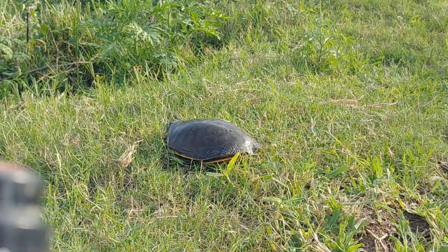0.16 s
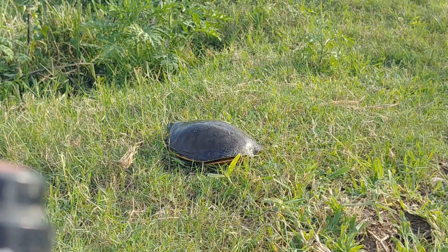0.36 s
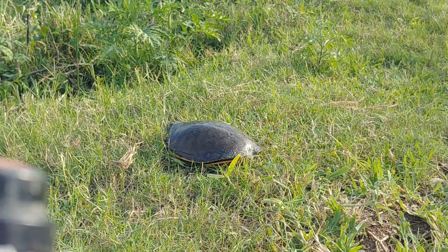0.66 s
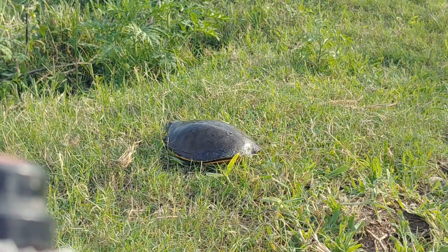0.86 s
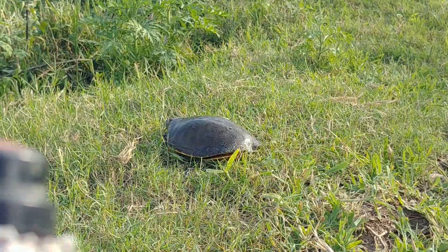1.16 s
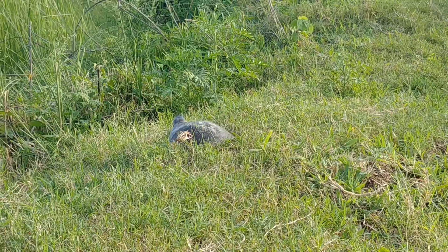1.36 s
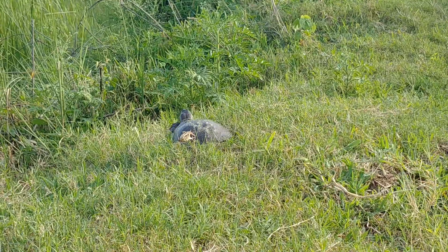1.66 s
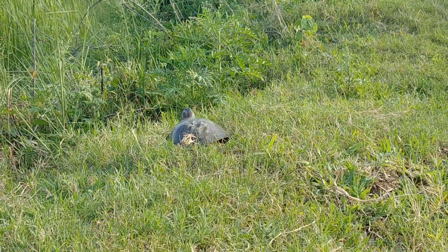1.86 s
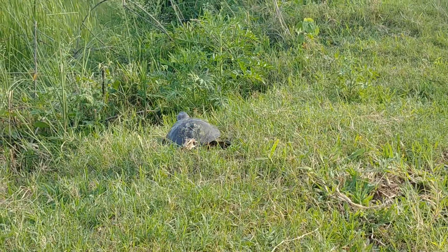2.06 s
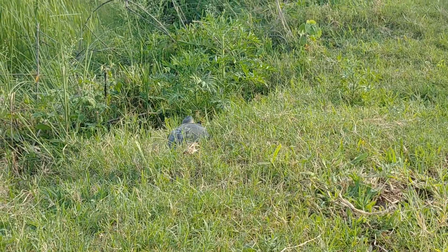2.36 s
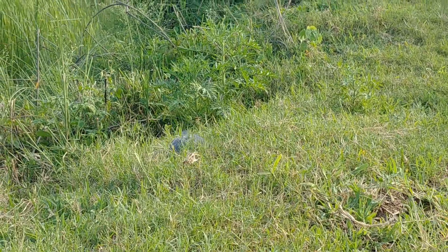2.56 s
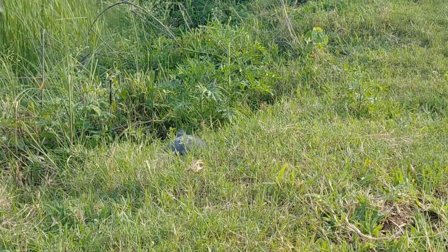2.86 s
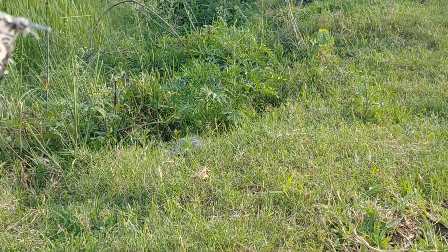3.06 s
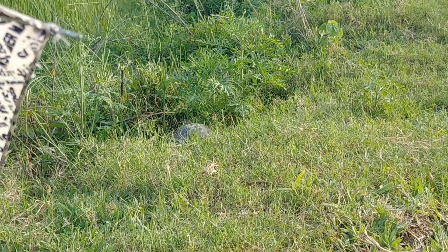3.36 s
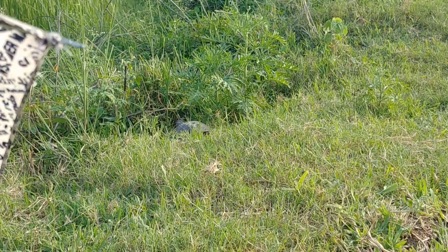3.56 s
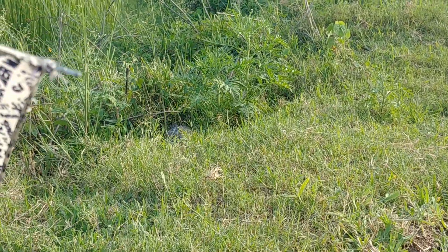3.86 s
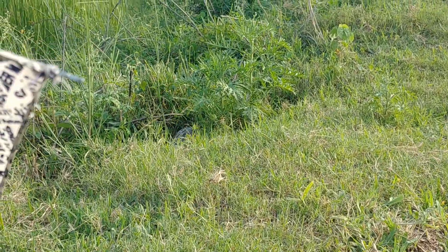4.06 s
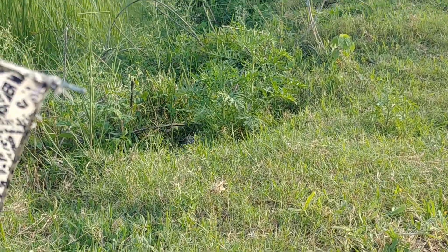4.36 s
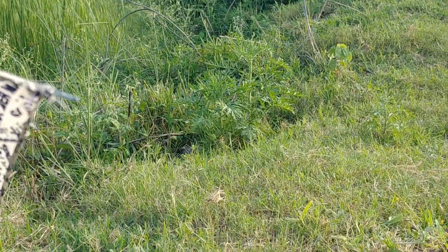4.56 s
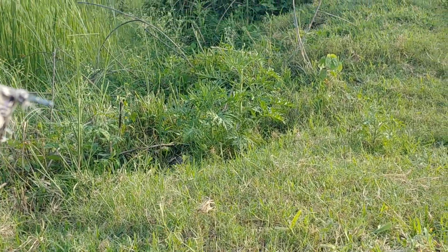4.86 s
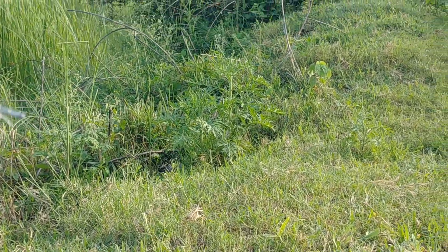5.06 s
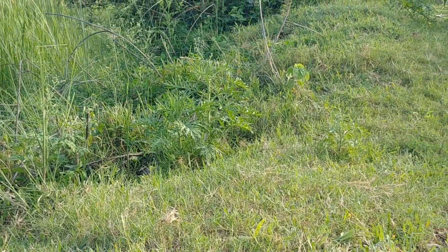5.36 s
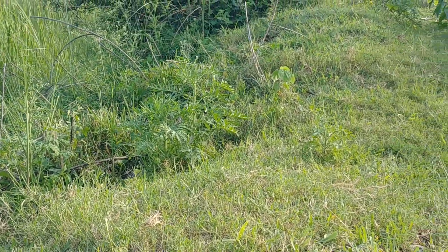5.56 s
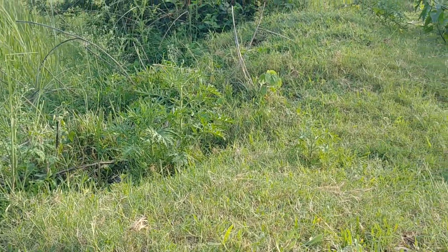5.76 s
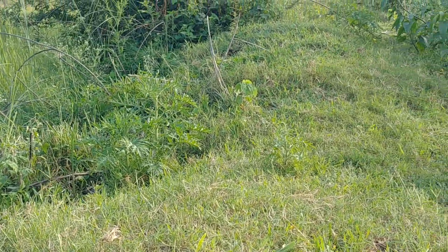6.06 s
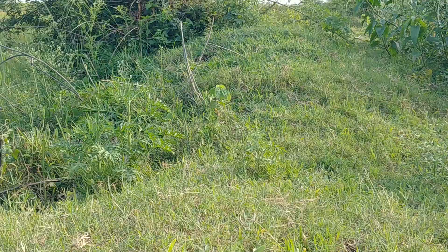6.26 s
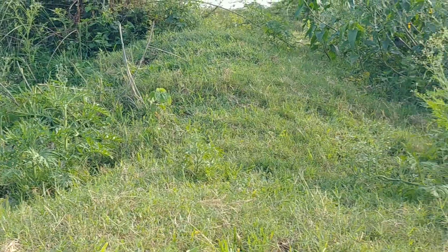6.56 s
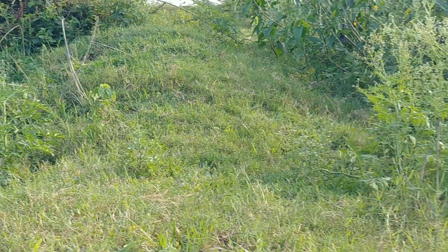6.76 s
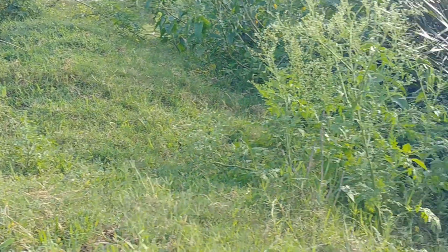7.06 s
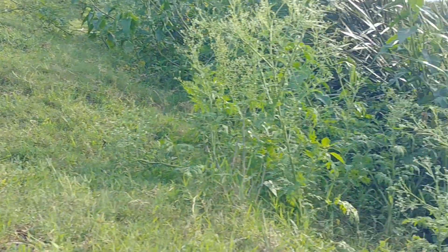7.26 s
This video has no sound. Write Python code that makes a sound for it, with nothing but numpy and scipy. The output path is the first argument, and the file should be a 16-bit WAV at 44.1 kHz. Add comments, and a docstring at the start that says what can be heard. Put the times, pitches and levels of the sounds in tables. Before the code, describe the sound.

Small birds chip, warble and give buzzy falling calls from bushes over a steady high cricket shrill, with soft wind puffs and dry ticks.

```python
"""Grassy canal bank

Small birds trade short chips, buzzy falling answers, low warbles and slurred whistles in the bushes, each call
a gliding near-pure tone followed by scattered echoes. Crickets shrill high and steadily: raspy carriers that throb.
Light puffs of wind, mostly on the left, are bursts of low noise; dry grass rustles and ticks as shaped noise.
Something drones far away: a low rumble with a wavering hum, under an open-air hush."""
import sys
import numpy as np
from scipy import signal
from scipy.fft import rfft, irfft
from scipy.io import wavfile
from scipy.ndimage import uniform_filter1d, map_coordinates

SR = 44100
rng = np.random.default_rng(int(sys.argv[2]) if len(sys.argv) > 2 else 0)


def int16_out(signal):
    """Quantize to a 16-bit WAV file."""
    q = np.round(np.clip(np.atleast_2d(signal).T, -1, 1) * 32767)
    wavfile.write(sys.argv[1], SR, q.astype(np.int16))


N = 326340
TIME = np.arange(N) / SR


def from_db(db):
    """Amplitude of a level in dB."""
    return 10 ** (np.asarray(db) / 20)


def rms_one(x):
    """Scale a sound to an rms of 1."""
    return x / np.sqrt(np.mean(x ** 2) + 1e-20)


def in_time(rows):
    """Draw straight lines through (seconds, value) points over the whole scene."""
    return np.interp(TIME, *np.transpose(rows))


def pan(db):
    """Left and right gains of constant power; positive leans left."""
    gains = from_db([[db / 2], [-db / 2]])
    return rms_one(gains)


def add(out, s, sound):
    """Mix a stereo sound in at time s."""
    at = max(0, int(s * SR))
    out[:, at:at + sound.shape[1]] += sound[:, :max(0, N - at)]


def drift(rate, size):
    """A smooth random wander of spread about 1, with `rate` random knots per second."""
    knots = rng.standard_normal(int(size / SR * rate) + 4)
    return map_coordinates(knots, [np.arange(size) / SR * rate], order=3, mode="nearest")


def noise(spectrum):
    """Coloured noise, unrelated in the two channels; rms 1."""
    hz, db = np.transpose(spectrum)
    bins_hz = np.fft.rfftfreq(N, 1 / SR)
    gain = from_db(np.interp(np.log(bins_hz + 1), np.log(hz), db))
    white = rng.standard_normal((2, N))
    return rms_one(irfft(rfft(white) * gain, N))


# Colour of the open-air hush. Each row: frequency in Hz, relative density in dB per Hz.
AIR_COLOUR = [(30, 10.5), (200, 8.5), (400, 1), (700, 3), (1200, -1.5), (1800, -5), (2600, -0.5),
              (4500, -8.5), (7000, -10.5), (10000, -42), (13000, -13.5), (16000, -13)]


def hush(level_db=-65):
    """Open air: steady broadband noise."""
    return from_db(level_db) * noise(AIR_COLOUR)


# Strength of the distant drone's rumble. Each row: time in seconds, level in dB.
DRONE_LEVEL = [(0, -60), (.5, -71), (1.4, -56), (7.4, -56)]
# Colour of the rumble. Each row: frequency in Hz, relative density in dB per Hz.
DRONE_COLOUR = [(30, -12), (80, -1.5), (140, -8), (200, -8.5), (300, -25), (600, -29), (2000, -75.5)]
# Harmonics of the hum. Each row: multiple of the turning rate, level in dB relative to the rumble.
HUM_HARMONICS = [(2, -2.5), (3, -2), (4, -9.5)]
HUM_HZ = 45.62


def distant_drone(side_db=5, unsteadiness=0.0164):
    """A low rumble with the wavering harmonic hum of a distant motor."""
    turns = 2 * np.pi * np.cumsum(HUM_HZ * (1 + unsteadiness * drift(5, N))) / SR
    hum = sum(from_db(db) * np.sin(multiple * turns) for multiple, db in HUM_HARMONICS)
    return pan(side_db) * from_db(in_time(DRONE_LEVEL)) * (noise(DRONE_COLOUR) + hum)


# Swishes of grass. Each row: middle in seconds, width in seconds, peak level in dB.
GRASS_SWISHES = [(1.109, 0.026, -58.5), (1.26, .12, -58.5), (1.421, 0.049, -53), (4.38, 0.051, -56.5),
                 (6.9, 1.2, -64.5)]
# Colour of grass on grass. Each row: frequency in Hz, relative density in dB per Hz.
GRASS_COLOUR = [(60, -20.5), (300, 8.5), (1300, 3), (2000, -1), (4500, -1), (7000, -9), (10000, -49.5)]


def grass(crinkle_db=3.0, stirring_db=-71):
    """Blades slip in small uneven bursts: a faint stirring that builds up, and swishes that swell over it."""
    blades = rms_one(noise(GRASS_COLOUR) * from_db(crinkle_db * drift(70, N)))
    first_swish_s = GRASS_SWISHES[0][0]
    stirring = from_db(stirring_db) * np.clip(TIME / first_swish_s, 0, 1) ** 2
    swish_power = sum(from_db(2 * db) * np.exp(-2 * ((TIME - s) / width) ** 2)
                      for s, width, db in GRASS_SWISHES)
    return np.sqrt(stirring ** 2 + swish_power) * blades


# Single crickets. Each row: carrier in Hz, early level in dB, later level in dB, throbs per second,
# time of one throb in seconds.
CRICKET_VOICES = [(7704, -59.5, -56.5, 2.7, 2.7), (7780, -59, -55.5, 9.1, 1.8), (7982, -54.5, -53, 5, 1.8),
                  (8035, -55, -59.5, 8, 0.89), (8100, -53.5, -51.5, 6.35, 1.88),
                  (8270, -53.5, -67, 7.5, 0.57)]
# Colour of the far chorus. Each row: frequency in Hz, relative density in dB per Hz.
CHORUS_COLOUR = [(6400, -51), (7200, -23.5), (7600, -3.5), (8000, 4), (8400, -6.5), (8850, -18.5),
                 (9200, -77.5)]
BALANCE_SHIFT_S = 1.45   # the balance between the cricket tones shifts abruptly


def crickets(throb_db=4, pulse_db=2, quick_db=3.5, wander_hz=14, rasp=0.67, rasp_hz=70,
             chorus_db=-52, side_db=16.0):
    """Each wing rings on a raspy tone and throbs about 3 to 9 times a second in several strokes, over a chorus."""
    out = from_db(chorus_db) * noise(CHORUS_COLOUR)
    later = np.clip((TIME - BALANCE_SHIFT_S) * 20, 0, 1)   # levels glide from early to later in 50 ms
    for hz, early_db, later_db, rate, throb_s in CRICKET_VOICES:
        phase = 2 * np.pi * np.cumsum(hz + wander_hz * drift(20, N)) / SR
        # The way through swaying grass shifts the phase at each side.
        paths = np.array([drift(4, N), drift(6.1, N)])
        tone = rms_one(np.sin(phase + paths))
        band = signal.butter(2, [hz - rasp_hz, hz + rasp_hz], "band", fs=SR, output="sos")
        scrape = rms_one(signal.sosfilt(band, rng.standard_normal((2, N))))
        wing = tone + rasp * scrape
        turn = 2 * np.pi * rate * (TIME - throb_s) + 0.57 * drift(2.1, N)
        strokes = from_db(throb_db * np.cos(turn) + pulse_db * np.cos(3 * turn) + quick_db * np.cos(4 * turn))
        level = from_db(early_db + later * (later_db - early_db))
        out = out + level * rms_one(wing * strokes)
    return pan(side_db) * out


def syrinx(hz, rise, fall):
    """A bird's voice: a pure tone on a pitch path that swells and fades over given shares of its length."""
    u = np.linspace(0, 1, len(hz))
    swell = np.sin(np.pi / 2 * np.clip(np.minimum(u / rise, (1 - u) / fall), 0, 1))
    return swell * np.sin(2 * np.pi * np.cumsum(hz) / SR)


FLICKS_PER_S, FIRST_FLICK_S = 50, .009   # the rate is varied slightly from call to call
FLICK_LAG, FLICK_SETTLE_S = .4, .025   # lag in flicks, and the time constant with which it builds


def chirp(length, first_hz, rest_hz, sink_s, swing, droop, droop_s, jitter, jitter_rate, flutter_db, crest_db,
          scoop, sharpness, rise, fall, ceiling_hz,
          widening=0.4, second_db=-20, second_ratio=.72, scoop_s=0.00405):
    """Pitch scoops up, sinks to rest with hoarse upward crests, then droops; the syrinx's other side is lower."""
    t = np.arange(int(length * SR)) / SR
    since = t - FIRST_FLICK_S
    lag = FLICK_LAG * (1 - np.exp(-since / FLICK_SETTLE_S))
    flicks = FLICKS_PER_S * since * rng.normal(1, .02) - lag
    crest = uniform_filter1d((1 - abs(np.sin(np.pi * flicks))) ** sharpness, size=130)
    scooping = 1 - scoop * np.exp(-t / scoop_s)
    drooping = 1 - droop * np.exp((t - length) / droop_s)
    glide = (rest_hz + (first_hz - rest_hz) * np.exp(-t / sink_s)) * scooping * drooping
    reach = swing * (1 + widening * t / length)   # the crests stay high while the troughs sink
    hoarseness = jitter * (.5 + 2 * crest) * drift(jitter_rate, len(t))
    hz = glide * (1 + reach * (crest - crest.mean()) + hoarseness)
    hz = hz / (1 + (hz / ceiling_hz) ** 20) ** (1 / 20)   # the voice cannot go higher than its ceiling
    strength = from_db(crest_db * crest + flutter_db * drift(144.3, len(t)))
    voice = syrinx(hz, rise, fall) * strength
    return rms_one(voice + from_db(second_db) * syrinx(hz * second_ratio, rise, fall))


# One bird's short chips. Each row: start in seconds, length in seconds, level in dB before the bushes.
CHIP_CALLS = [(0, 0.043, -60.5), (.775, 0.052, -60), (2.035, 0.048, -64.5), (2.157, .066, -56.5),
              (2.714, 0.057, -50), (2.867, 0.022, -57.5), (3.009, 0.077, -48.5), (3.506, 0.064, -50.5),
              (3.622, 0.022, -59.5), (3.833, .062, -48.5), (4.166, 0.053, -41), (5.047, 0.055, -49),
              (5.707, 0.049, -45.5), (6.378, 0.056, -46.5)]


def chips(first_hz=4850, side_db=4.5):
    """Short hoarse calls of a few quick pitch flicks."""
    out = np.zeros((2, N))
    for s, length, db in CHIP_CALLS:
        call = chirp(length, first_hz, rest_hz=4230, sink_s=0.0513, swing=0.338, droop=.31, droop_s=.01,
                     jitter=.052, jitter_rate=800, flutter_db=2.5, crest_db=-2, scoop=.17, sharpness=1.2,
                     rise=.24, fall=.33, ceiling_hz=5900)
        add(out, s, pan(side_db) * from_db(db) * call)
    return out


# A lower bird's warbles. Each row: start in seconds, length in seconds, central pitch in Hz,
# level in dB before the bushes.
WARBLE_CALLS = [(0.057, 0.13, 2930, -68.5), (0.386, 0.15, 2920, -72), (1.744, .12, 2943, -53.5),
                (3.053, .12, 2760, -58.5), (3.398, 0.13, 2723, -56.5), (3.81, 0.12, 2767, -52.5),
                (4.132, .125, 2750, -53), (6.134, 0.14, 3010, -48.5), (6.448, 0.16, 2980, -52.5),
                (7.146, 0.064, 3050, -51)]


def warbles(count=3, lead=.25, lead_from=.84, top=1.18, bottom=0.72, loudest=.35, gap_db=20, lead_db=-9,
            jitter=.024, edge=0.22, side_db=-4.5):
    """A soft rising lead-in, then three notes that each slide down and are loudest on the way."""
    out = np.zeros((2, N))
    for s, length, pitch, db in WARBLE_CALLS:
        u = np.linspace(0, 1, int(length * SR))
        leading = u < lead
        note = (count * (u - lead) / (1 - lead)) % 1   # progress through each note
        rising = lead_from + (1 - lead_from) * (u / lead) ** 2
        sliding = top * (bottom / top) ** note
        ratio = np.where(leading, rising, sliding)
        level = np.where(leading, lead_db, -gap_db * np.sin(np.pi * (note - loudest)) ** 2)
        hz = pitch * uniform_filter1d(ratio, size=200) * (1 + jitter * drift(160, len(u)))
        voice = syrinx(hz, edge, edge) * from_db(uniform_filter1d(level, size=200))
        add(out, s, pan(side_db) * from_db(db) * rms_one(voice))
    return out


def whistle(hz, waver, flutter_db, rise=0.13, fall=0.4):
    """A pure tone that wavers a little in pitch and strength; rms 1."""
    wavering_hz = hz * (1 + waver * drift(130, len(hz)))
    flutter = from_db(flutter_db * drift(71, len(hz)))
    return rms_one(syrinx(wavering_hz, rise, fall) * flutter)


def far_chirps(calls_per_s=2.5, middle_db=-73.5, pitch_hz=4500, length_s=0.065, spread=0.081, swing=.09,
               side_db=3, uneven_db=3):
    """Faint wavering calls from further along the bank, each at a random moment of its own time slot."""
    out = np.zeros((2, N))
    slots = np.arange(0, N / SR - 1 / calls_per_s, 1 / calls_per_s)
    chances = rng.uniform(-1, 1, (len(slots), 4))
    for s, (late, long, high, loud) in zip(slots, chances):
        size = int(length_s * 2 ** (long / 2) * SR)
        hz = np.full(size, pitch_hz * (1 + spread * high))
        gain = pan(side_db) * from_db(middle_db + uneven_db * loud)
        add(out, s + abs(late) / calls_per_s, gain * whistle(hz, swing, flutter_db=1))
    return out


# Dry stems ticking. Each row: start in seconds, level in dB, centre in Hz.
STEM_TICKS = [(0.503, -52.5, 5650), (.695, -54, 6150), (0.761, -49, 5160), (1.089, -48.5, 2850),
              (1.24, -49, 9400), (2.49, -55, 2250), (2.845, -48, 5630), (4.36, -43, 5200),
              (5.402, -59, 10050), (5.99, -46.5, 1110)]
TICK_CYCLES = 23.6   # time constant of a stem's ring, in cycles of its centre frequency


def ticks(side_db=2, attack_s=0.00069):
    """A stem snaps: a noise burst that dies fast, faster for brighter stems, in a band set by the stem."""
    out, t = np.zeros((2, N)), np.arange(SR // 10) / SR
    for s, db, hz in STEM_TICKS:
        decay = TICK_CYCLES / hz
        spread = 1 + 1500 / hz   # dull crunches span more octaves than bright snaps
        low, high = hz / spread, min(hz * spread, SR / 2.2)
        burst = rng.standard_normal((2, len(t))) * np.exp(-t / decay) * (1 - np.exp(-t / attack_s))
        band = signal.butter(3, [low, high], "band", fs=SR, output="sos")
        snap = signal.sosfilt(band, burst) * np.sqrt(SR / 2 / (high - low))   # make up for the narrow band
        add(out, s, pan(side_db) * from_db(db) * snap)
    return out


# Wind puffs on the microphone port. Each row: middle in seconds, strength in dB before the overall wind level.
WIND_PUFFS = [(1.558, -40.5), (1.678, -31.5), (1.824, -33), (1.914, -37), (2.345, -36), (2.424, -31),
              (2.637, -32), (3.518, -43.5), (4.118, -36), (4.202, -36.5), (4.281, -33.5), (4.392, -32),
              (4.576, -29.5), (4.664, -36.5), (4.735, -32), (5.068, -32.5), (5.27, -28.5), (5.854, -28.5),
              (6.345, -42), (6.654, -24.5), (7.292, -24.5)]
# Colour of the main turbulence. Each row: frequency in Hz, relative density in dB per Hz.
WIND_COLOUR = [(30, -12), (80, 3.5), (170, -1), (300, -17), (450, -39), (2000, -110)]
# Colour of the small eddies. Each row: frequency in Hz, relative density in dB per Hz.
EDDY_COLOUR = [(100, -12), (220, 1.5), (370, -10), (520, -20), (2000, -100)]
PUFF_WIDTH_S, PUFF_HALVING_DB = 0.016, 7.5   # width of a -30 dB puff; a puff this much stronger is half as long


def wind(side_db=20, level_db=-3, wake_db=-13, wake_width=2.97, strong_db=-25, eddy_growth=2.33):
    """Each puff is a knot of turbulence inside a longer, weaker wake; stronger ones shed more small, higher eddies."""
    power = np.zeros(N)
    for s, db in WIND_PUFFS:
        width = PUFF_WIDTH_S * 2 ** (-(db + 30) / PUFF_HALVING_DB)
        x = (TIME - s) / width
        knot = np.exp(-2 * x ** 2)
        wake = from_db(2 * wake_db) * np.exp(-(x / wake_width) ** 2)
        power += from_db(2 * db) * (knot + wake)
    strength = np.sqrt(power)
    eddies = (strength / from_db(strong_db)) ** eddy_growth * noise(EDDY_COLOUR)
    flow = noise(WIND_COLOUR) + eddies
    flow = flow / np.sqrt(uniform_filter1d(flow ** 2, size=900) + 0.0033)   # even strength within a puff
    return pan(side_db) * from_db(level_db) * strength * flow


# Level whistled notes. Each row: start in seconds, length in seconds, pitch in Hz, level in dB before the bushes,
# waver as a share of the pitch.
LEVEL_NOTES = [(1.639, 0.015, 2670, -60, 0.049), (4.325, 0.046, 2870, -58.5, 0.022),
               (4.836, 0.13, 2970, -68, .025), (7.25, 0.172, 3383, -51, 0.0048)]


def level_notes(side_db=-2, arch=0.01):
    """Whistled notes whose pitch arches slightly."""
    out = np.zeros((2, N))
    for s, length, pitch, db, waver in LEVEL_NOTES:
        hz = pitch * (1 - arch * np.linspace(-1, 1, int(length * SR)) ** 2)
        add(out, s, pan(side_db) * from_db(db) * whistle(hz, waver, flutter_db=5.3, rise=.2, fall=.25))
    return out


# Thin upward flicks. Each row: start in seconds, level in dB before the bushes.
UPWARD_FLICKS = [(3.328, -64), (3.635, -62), (5.931, -66), (6.688, -56.5), (7.208, -61.5)]


def upslurs(length_s=.045, from_hz=4050, to_hz=7350, side_db=9):
    """Quick whistles that sweep steadily upward in octaves."""
    out = np.zeros((2, N))
    for s, db in UPWARD_FLICKS:
        hz = np.geomspace(from_hz, to_hz, int(length_s * SR))
        add(out, s, pan(side_db) * from_db(db) * whistle(hz, waver=.012, flutter_db=2.5))
    return out


# A second bird's long buzzy answers. Each row: start in seconds, length in seconds, first pitch of the glide in Hz,
# level in dB before the bushes.
BUZZ_CALLS = [(3.922, 0.13, 5430, -51), (4.349, .12, 5010, -43.5), (5.137, 0.13, 5330, -44),
              (5.509, .12, 5190, -38.5), (5.844, 0.12, 5060, -41.5), (6.163, 0.13, 5120, -42.5),
              (6.429, .12, 5055, -38.5), (6.723, 0.16, 5000, -43), (6.882, 0.14, 5054, -39),
              (7.004, 0.13, 4080, -44)]
# Its bearing as the listener turns. Each row: time in seconds, left-right balance in dB.
BUZZ_SIDE = [(6.45, 11), (7.1, 1.5)]


def buzzes():
    """Longer, clearer answers from a nearer perch."""
    out = np.zeros((2, N))
    for s, length, first_hz, db in BUZZ_CALLS:
        call = chirp(length, first_hz, rest_hz=3954, sink_s=.055, swing=0.3745, droop=0.32, droop_s=.014,
                     jitter=.02, jitter_rate=430, flutter_db=3.5, crest_db=-2, scoop=.15, sharpness=1.35,
                     rise=.18, fall=.33, ceiling_hz=6900)
        side_db = np.interp(s, *np.transpose(BUZZ_SIDE))
        add(out, s, pan(side_db) * from_db(db) * call)
    return out


def far_birds(centre_hz=2540, half_width_hz=220, level_db=-66, middle_s=6.6, spread_s=0.97):
    """Distant callers blur into one narrow band of noise that swells and fades."""
    edges_hz = [centre_hz - half_width_hz, centre_hz + half_width_hz]
    band = signal.butter(2, edges_hz, "band", fs=SR, output="sos")
    blur = rms_one(signal.sosfilt(band, rng.standard_normal((2, N))))
    return from_db(level_db) * blur * np.exp(-((TIME - middle_s) / spread_s) ** 2)


# Long falling whistles. Each row: start in seconds, length in seconds, first pitch in Hz,
# level in dB before the bushes, left-right balance in dB, flutter in dB.
FALLING_WHISTLES = [(6.535, .15, 5450, -48.5, 5, 4), (6.635, .105, 4150, -46.5, -4, 3.5),
                    (6.756, .265, 5020, -39.5, .5, 1.5)]


def falls(fall_share=.47, steepening=1.4, shoulder_octaves=0.1):
    """Whistles that lose a share of their pitch, ever faster, with a shoulder halfway."""
    out = np.zeros((2, N))
    for s, length, first_hz, db, side_db, flutter_db in FALLING_WHISTLES:
        u = np.linspace(0, 1, int(length * SR))
        shoulder = 2 ** (-shoulder_octaves * np.sin(2 * np.pi * u) * np.sin(np.pi * u))
        hz = first_hz * (1 - fall_share * u ** steepening) * shoulder
        call = whistle(hz, .004 * flutter_db, flutter_db, rise=.3, fall=.35)
        add(out, s, pan(side_db) * from_db(db) * call)
    return out


def bushes(x, direct_db=-2, near_db=-2.0, near_t60=0.15, far_db=-17, far_t60=0.31):
    """Stems and ground throw back quick echoes that tangle each call; the far bank returns a faint diffuse tail."""
    t = np.arange(SR) / SR
    near = (rng.random((2, len(t))) < 900 / SR) * from_db(-60 * t / near_t60)   # about 900 echoes per second
    far = from_db(-60 * t / far_t60)
    out = from_db(direct_db) * x
    for db, shape, source in ((near_db, near, x), (far_db, far, x.mean(0, keepdims=True))):
        echoes = rng.standard_normal((2, len(t))) * shape * (t > .002)
        echoes /= np.sqrt(np.sum(echoes ** 2, axis=1, keepdims=True))
        out = out + from_db(db) * signal.fftconvolve(source, echoes, axes=1)[:, :N]
    return out


def scene():
    """Calls among the stems and from the nearer perch, with crickets, wind, grass and distance around them."""
    background = hush() + distant_drone() + grass()
    thicket = bushes(chips() + warbles() + far_chirps() + level_notes() + upslurs() + falls())
    perch = bushes(buzzes(), direct_db=-2.5, near_db=-6, near_t60=0.14, far_db=-14)
    return background + crickets() + thicket + ticks() + wind() + perch + far_birds()


def record(dry, low_cut_hz=52, cutoff_hz=15800):
    """The microphone loses the deep bass; the top is cut steeply."""
    thinned = signal.sosfilt(signal.butter(4, low_cut_hz, "high", fs=SR, output="sos"), dry)
    return signal.sosfilt(signal.ellip(10, .2, 70, cutoff_hz, fs=SR, output="sos"), thinned)


dry = scene()
out = record(dry)
int16_out(out)
```